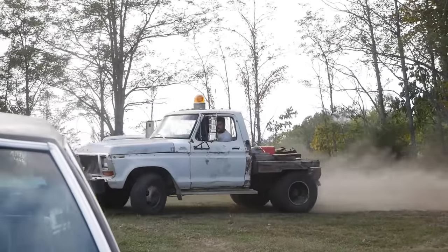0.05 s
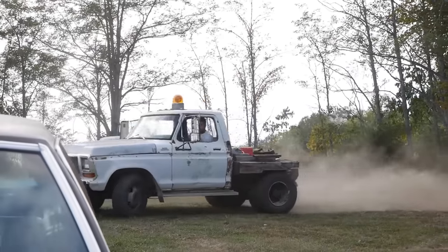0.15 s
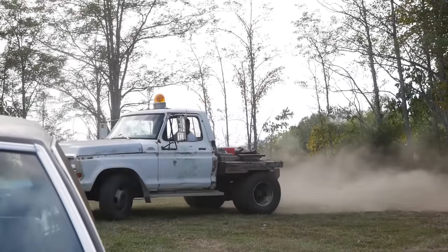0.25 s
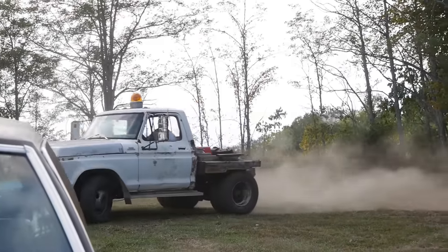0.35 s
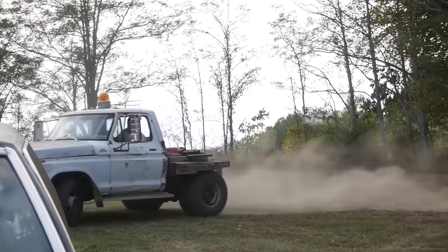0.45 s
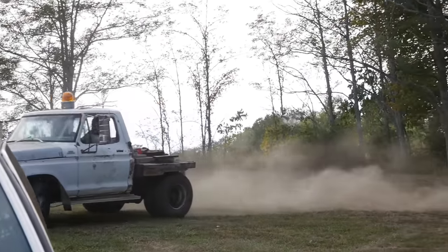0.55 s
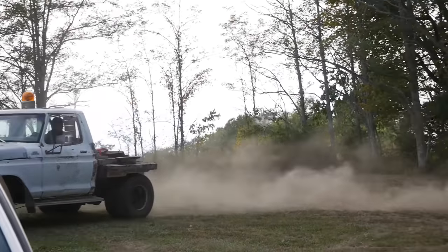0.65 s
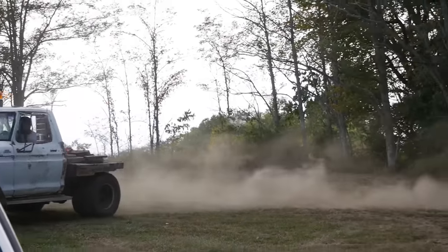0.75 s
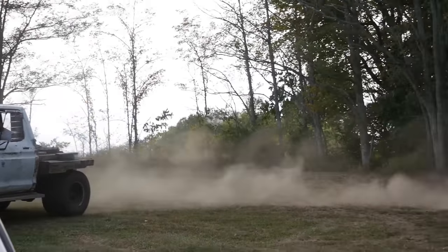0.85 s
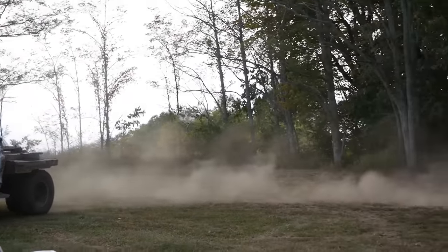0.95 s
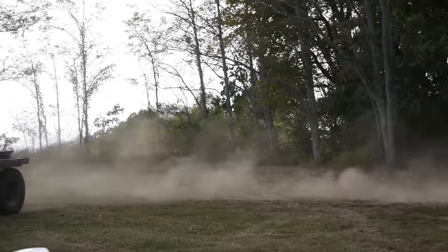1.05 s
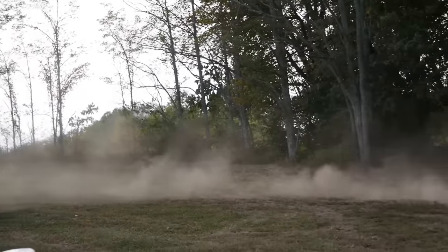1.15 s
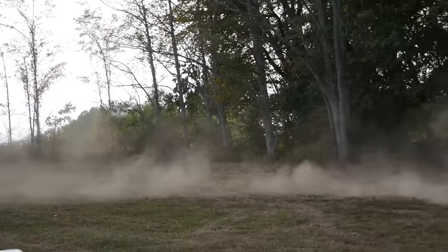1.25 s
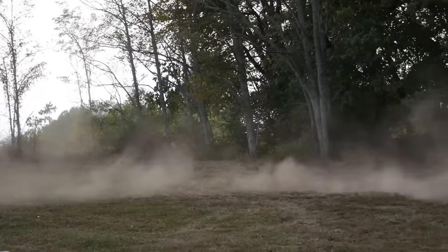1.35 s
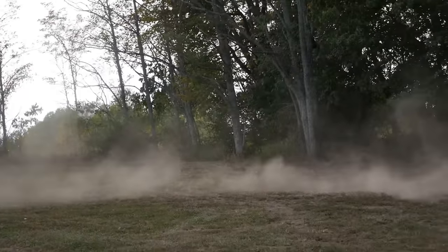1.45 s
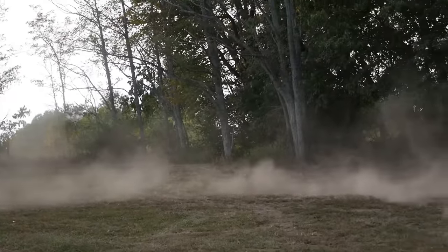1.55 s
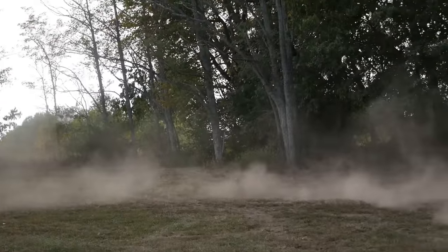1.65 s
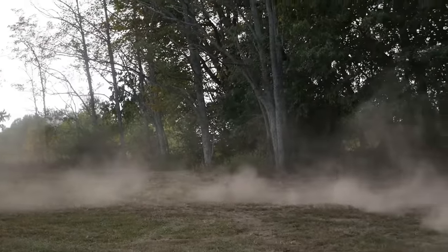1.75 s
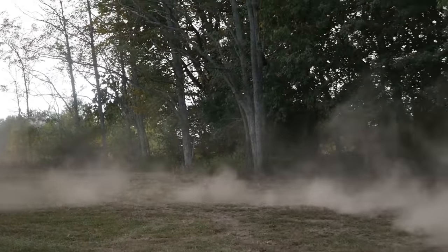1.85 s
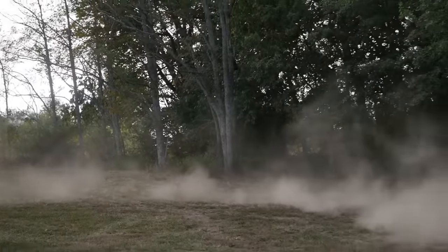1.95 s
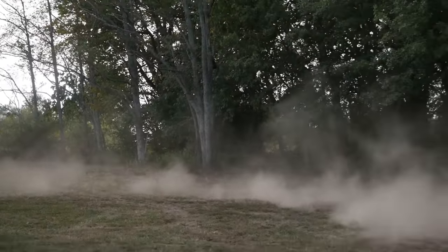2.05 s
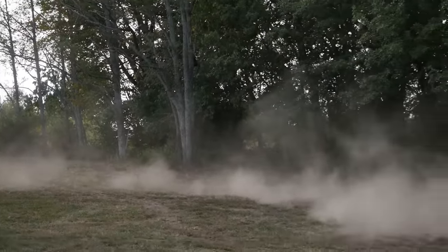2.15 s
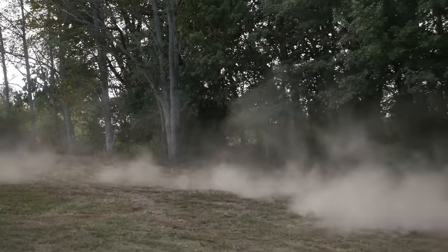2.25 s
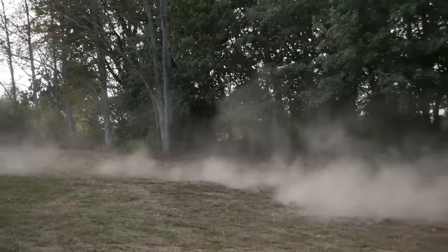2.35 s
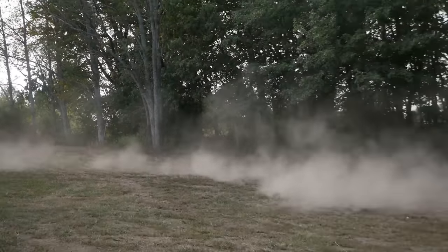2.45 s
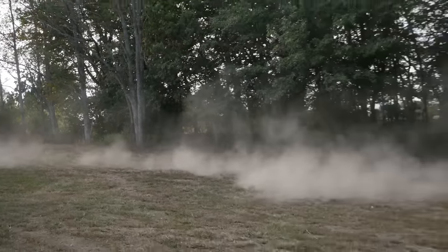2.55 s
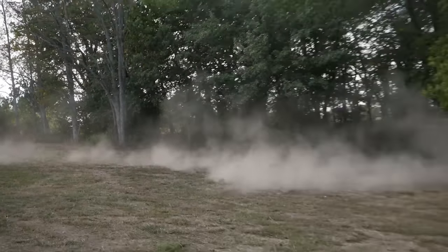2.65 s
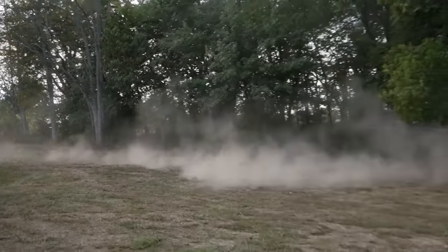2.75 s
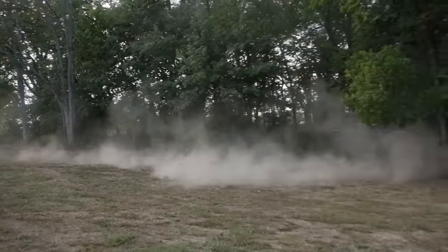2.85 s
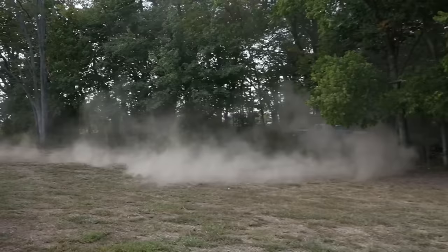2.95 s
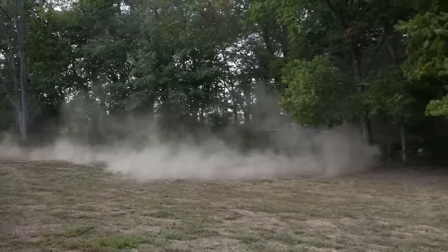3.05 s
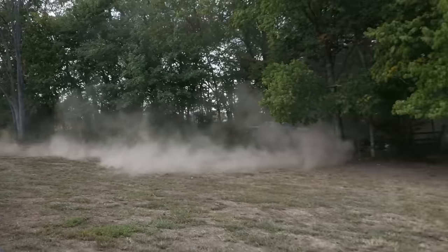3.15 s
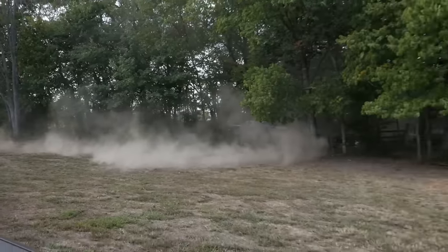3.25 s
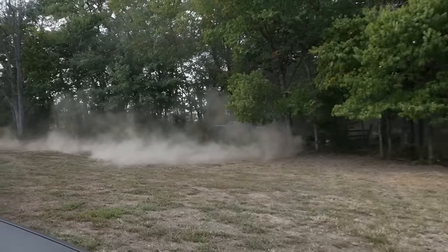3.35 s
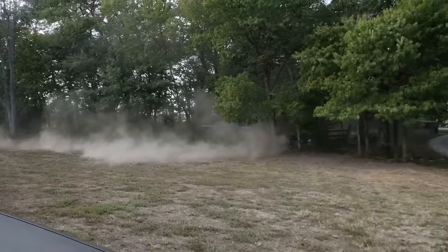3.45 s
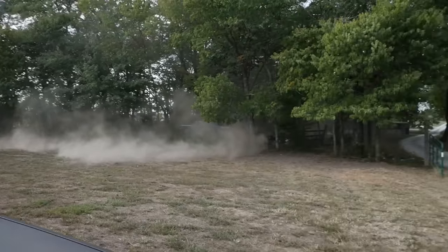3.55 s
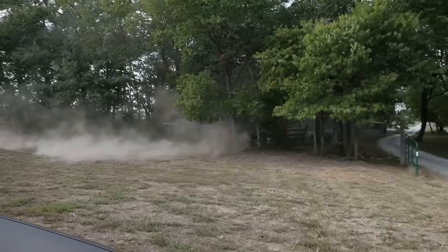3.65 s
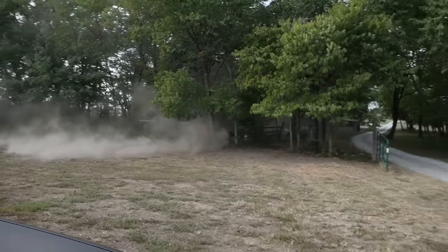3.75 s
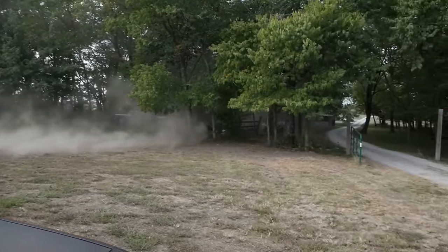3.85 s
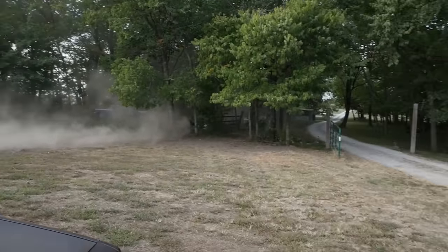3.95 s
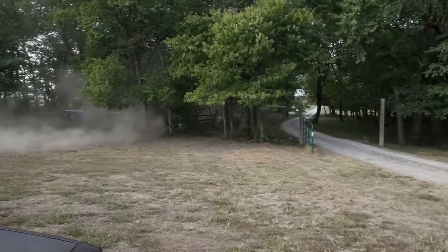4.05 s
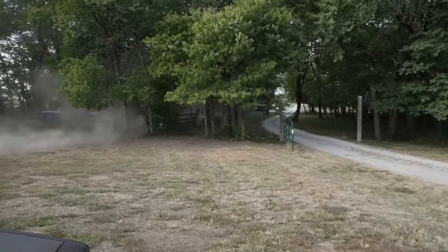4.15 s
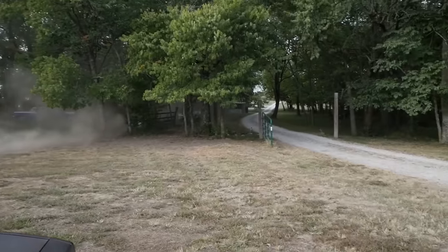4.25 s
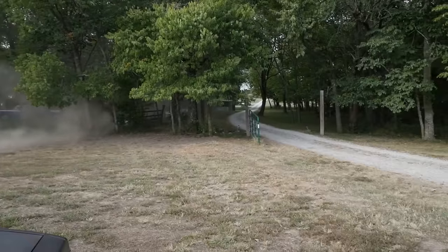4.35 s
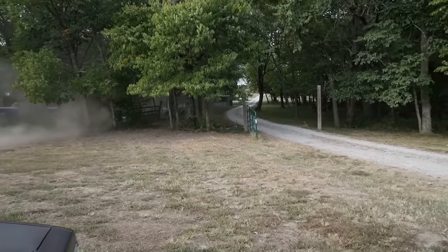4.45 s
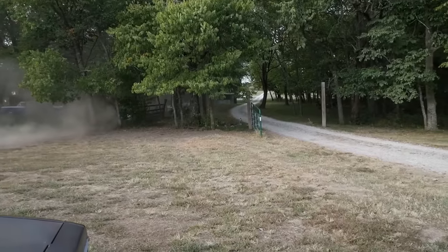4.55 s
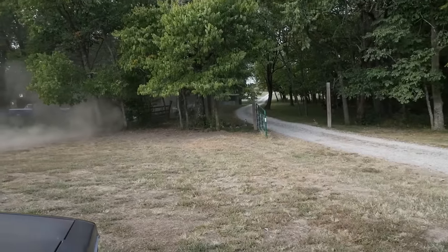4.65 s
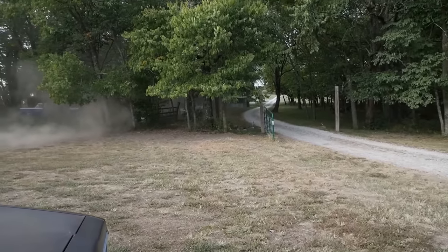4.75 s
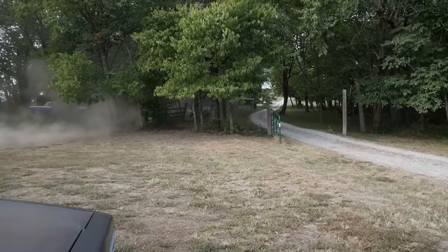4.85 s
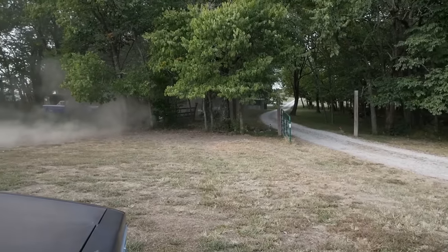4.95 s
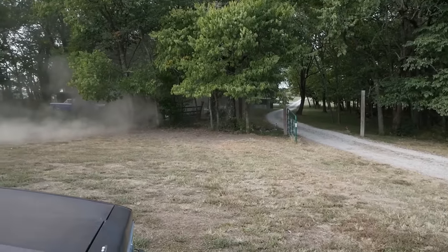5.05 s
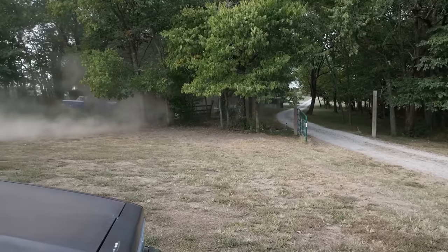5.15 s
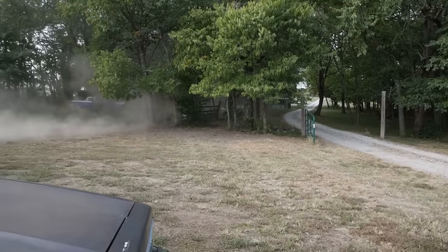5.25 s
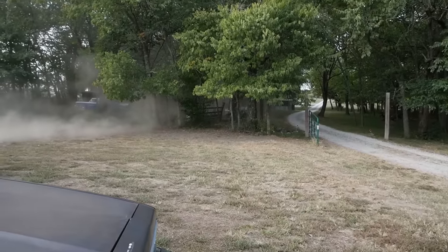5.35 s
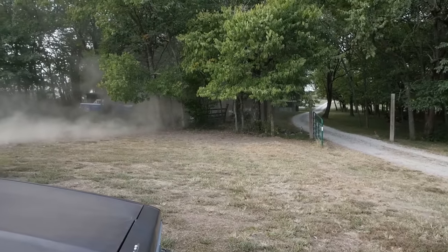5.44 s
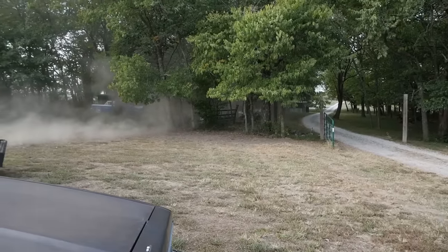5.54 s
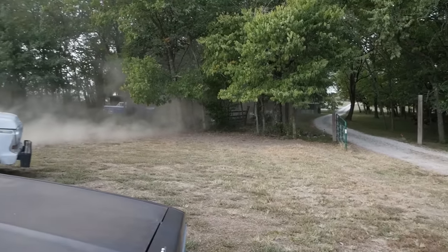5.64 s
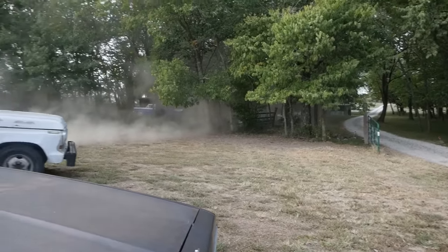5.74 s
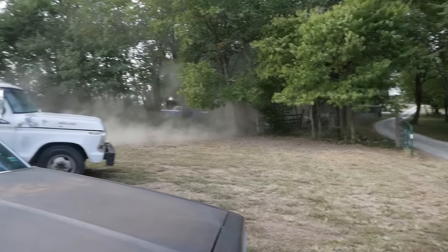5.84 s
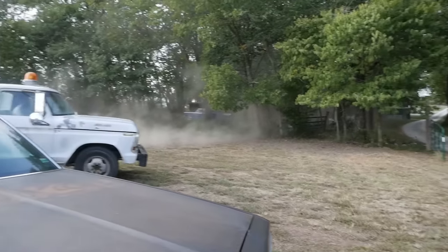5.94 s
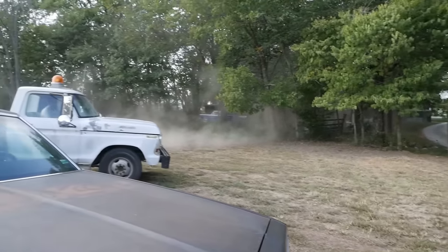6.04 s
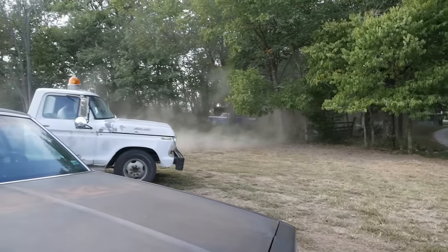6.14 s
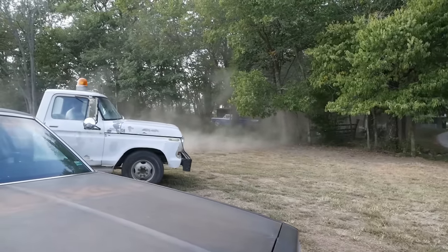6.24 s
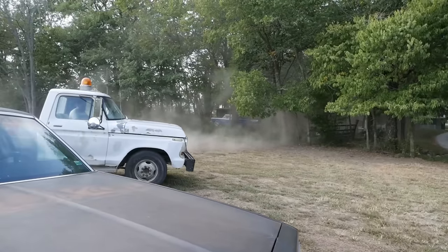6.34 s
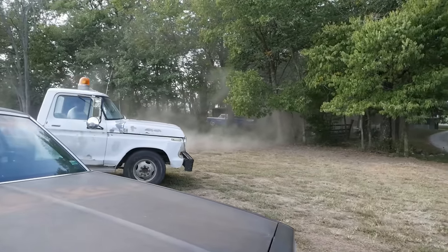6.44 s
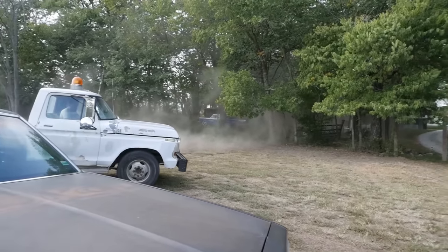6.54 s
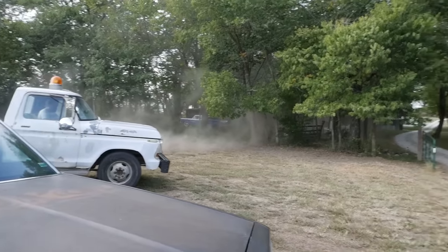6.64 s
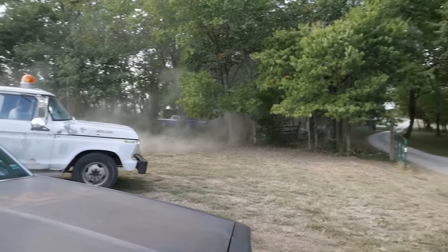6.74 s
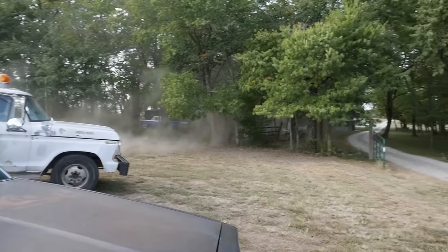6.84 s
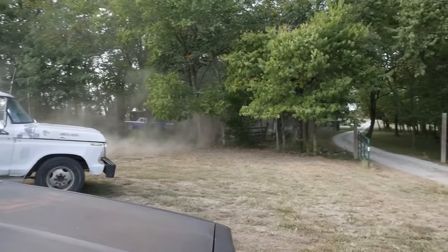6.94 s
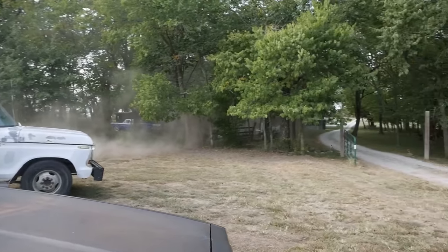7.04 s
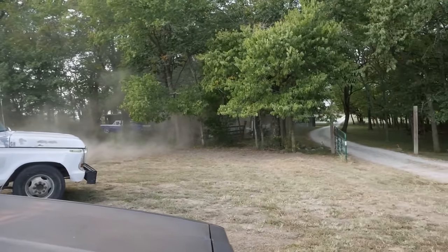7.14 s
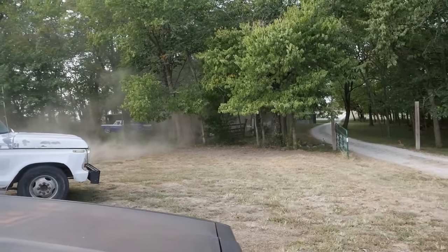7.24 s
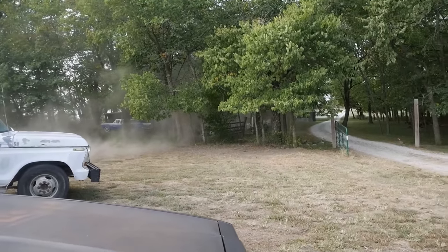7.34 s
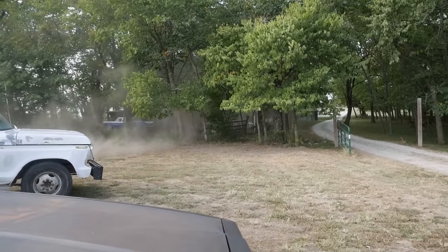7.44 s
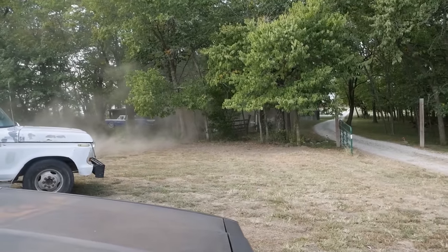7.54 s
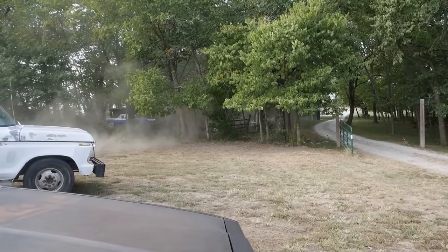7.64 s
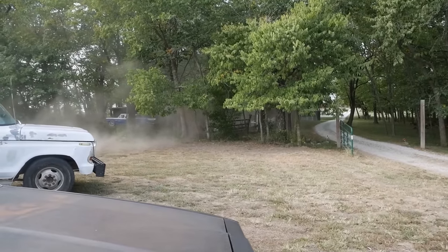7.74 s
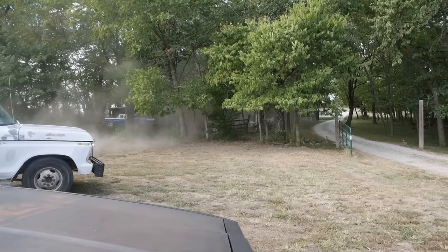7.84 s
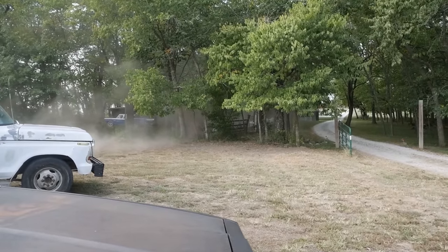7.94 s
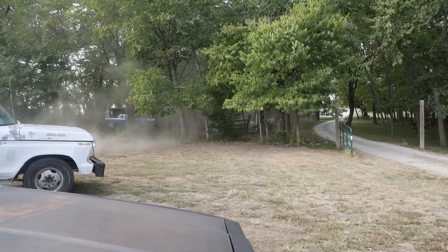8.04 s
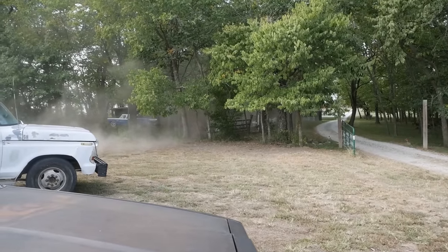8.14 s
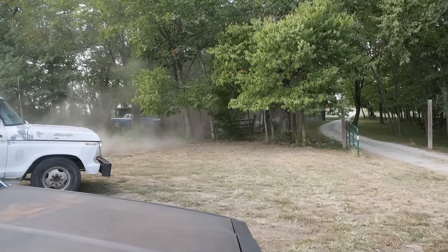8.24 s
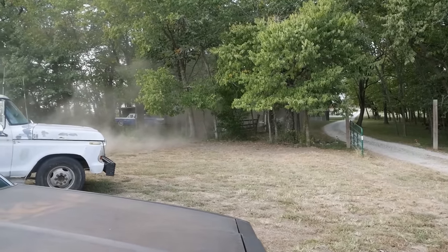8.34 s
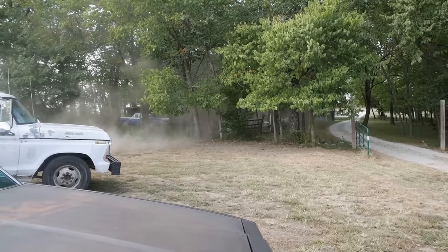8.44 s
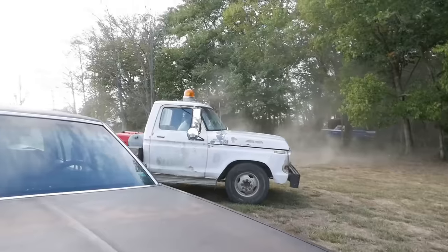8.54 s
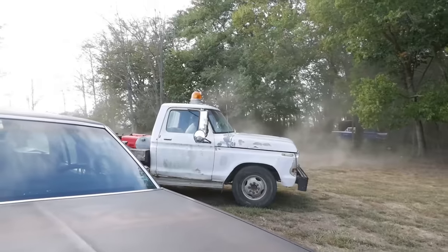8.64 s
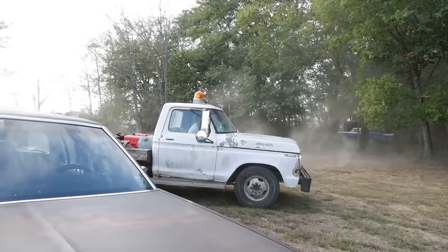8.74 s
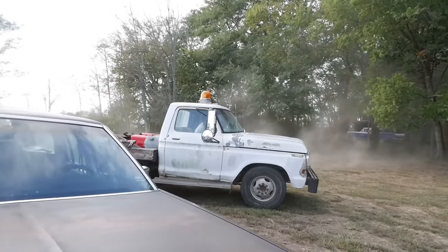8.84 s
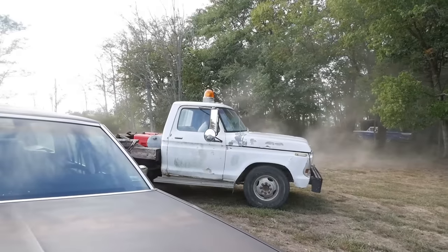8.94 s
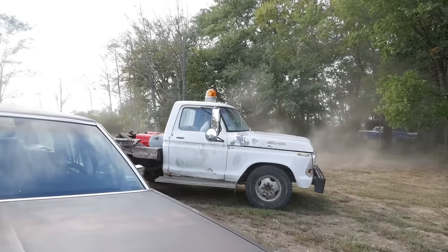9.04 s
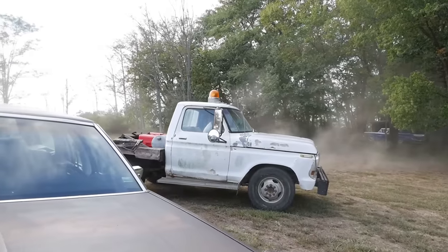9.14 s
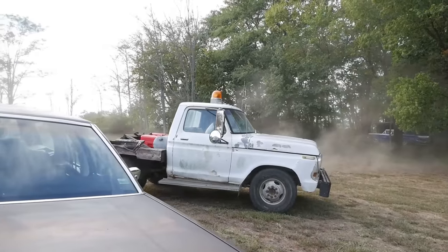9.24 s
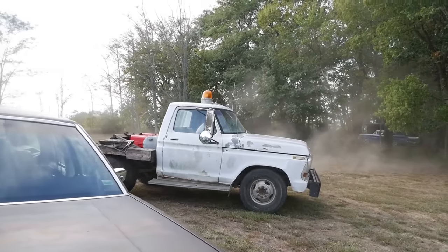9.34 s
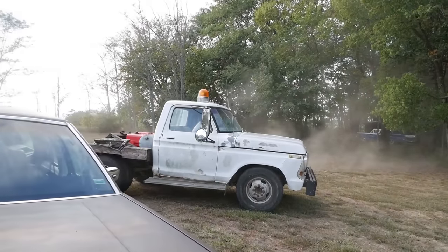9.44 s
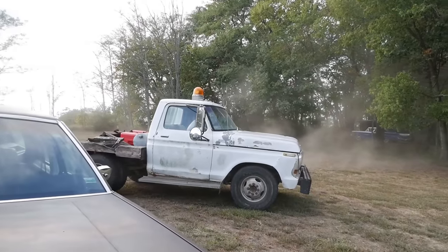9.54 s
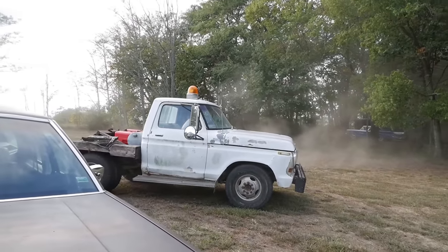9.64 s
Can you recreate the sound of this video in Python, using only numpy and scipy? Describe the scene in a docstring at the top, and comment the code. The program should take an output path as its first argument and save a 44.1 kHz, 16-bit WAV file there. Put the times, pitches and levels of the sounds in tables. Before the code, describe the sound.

Outdoors, a few metres from an old V8 truck: throaty, uneven exhaust with tyre drumming and body rattles sags, then closes down to loose ticking. A short blip collapses into heavy single thumps and a stall. About a second of near-quiet field, then the starter clanks and grinds with metallic clashes. Phone-like recording, nearly mono, thin in deepest bass.

```python
"""A field, a few metres from an old V8 flatbed truck: the revs sag, the throttle closes, a blip, lone firings,
a stall, then the starter grinds. Firing pulses ring the exhaust pipe under gusts of noise; body rattles, puffs,
squeaks and scrapes are shaped bursts of noise, and gear clashes excite ringing metal modes. Settling knocks
are decaying tones. Insects, a far drone and a hum fill the quiet."""
import sys
import numpy as np
from scipy import signal
from scipy.fft import rfft, irfft, next_fast_len
from scipy.io import wavfile
from scipy.ndimage import uniform_filter1d

SR = 44100
rng = np.random.default_rng(int(sys.argv[2]) if len(sys.argv) > 2 else 0)


def master_out(mix):
    """Clip the mix to full scale and print it as 16-bit PCM to the path in sys.argv[1]."""
    frames = np.transpose(np.atleast_2d(mix))
    ceiling = np.clip(frames, -1, 1)
    pcm = np.round(ceiling * 32767).astype(np.int16)
    wavfile.write(sys.argv[1], SR, pcm)


N = 427309
T = np.arange(N) / SR

# Levels in the tables are before each layer's own trims and resonances.

# Firing rate of the whole engine [t/s, f/Hz]
REVS = [(0, 82.8), (.25, 76.8), (.7, 61.6), (1.2, 66.0), (1.5, 54.7), (1.75, 57.0), (2, 53.5), (2.3, 56.5),
        (2.75, 47.6), (3, 51.6), (3.3, 49.2), (3.75, 49.3), (4, 51.7), (5.6, 32.85), (5.75, 49), (5.9, 55),
        (6.05, 62), (6.2, 64), (6.3, 43.6)]
# Cylinders in firing order, every other one comes by the far pipe [level/dB]
CYLINDERS_DB = [-6, -16, -6, -16, -1, -16, 0, -16]
# Throttle, heard as the level of the exhaust [t/s, level/dB]
THROTTLE = [(0, -31.5), (.3, -35), (.45, -42.5), (.62, -35.5), (.9, -31.5), (1.4, -27), (1.75, -32),
            (2.0, -24.5), (2.5, -23.5), (2.75, -28), (3.0, -23), (4.02, -26), (4.08, -43.5), (5.0, -60.5),
            (5.45, -32.5), (5.66, -37.5), (5.74, -24.5), (5.95, -20), (6.08, -19.5), (6.16, -17),
            (6.22, -28), (6.26, -65)]
# How lumpy the engine turns [t/s, share 0-1 of the cylinder pattern]
LOPE = [(0, 0.5), (.35, 0.85), (1.75, 0.2), (3.0, 0.8), (3.9, 0.88), (4.1, 0.5), (5.7, 0.58), (6.26, 0.7)]
FIRST_PHASE = 0.87  # of a firing
EVEN_DB, UNEVEN_DB = 1.4, 4  # scatter of the firings with the throttle open and shut
OPEN_DB, SHUT_DB = -25, -36  # exhaust levels that count as open and shut
LATE_S = 0.0012  # most a firing comes late, per dB of scatter
# Exhaust pipe resonances [f/Hz, t60/s, level/dB]
PIPE = [(30, 0.079, -2), (63, 0.21, -32), (77.6, 0.27, 3), (91.6, 0.13, -4), (120, 0.056, -2.5),
        (152, 0.041, -17), (250, 0.056, -31), (328, 0.034, 3)]
# Gas tearing at the pipe's mouth [f/Hz, width/Hz, level/dB]
RASP = [(1450, 120, 6), (1815, 80, -7), (2100, 280, 4.5), (3250, 220, -0.5), (3750, 130, -14),
        (5050, 200, -24)]
RASP_DB, RASP_T60_S = -22.5, 0.061  # level against the exhaust
# Gas roar and fan [t/s, level/dB, treble/dB]
ROAR = [(0, -33.5, -4), (.72, -35, -8), (.92, -30.5, -10), (1.5, -31, -9.5), (1.87, -30, -11.5),
        (2.1, -30.5, -12), (2.9, -34.5, -7.5), (3.34, -30, -9), (4.04, -33, -5.5), (4.23, -45.5, -2.5),
        (4.6, -30, -12), (5.16, -43, -5), (5.25, -39.5, -5.5), (5.42, -40.5, -3), (5.5, -31.5, -8.5),
        (5.65, -37.5, -6), (5.74, -27, -11), (6.04, -30.5, -2.5), (6.1, -28.5, 1), (6.2, -30, -4.5),
        (6.33, -35.5, 1), (6.71, -34.5, -2), (6.96, -39, -4), (7.11, -30, -8), (7.3, -46.5, 2.5),
        (7.5, -47.5, -10), (7.6, -50, -25)]
# Spectrum of the roar [f/Hz, level/dB per Hz]
ROAR_COLOUR = [(71, 2.5), (120, -4), (156, -4.5), (208, -9), (598, -11.5), (676, -16), (936, -16.5),
               (1690, -27), (4390, -36), (5610, -36.5), (9710, -51.5), (14300, -51), (15500, -71)]
# Engine bay and tailpipe resonances in the roar [f/Hz, width/Hz, level/dB]
BAY = [(900, 100, 0.5), (1523, 165, -5.5), (1790, 310, -9.5), (2150, 230, -8.5), (2610, 240, -8.5),
       (3290, 300, -6), (3700, 430, -7.5), (5240, 490, -8.5)]
BAY_PATCHY_DB, CRACKLE_DB = 4, 2
# Tyres on turf: level against the roar, and its fade as the firing rate sags below full
DRUM_DB, DRUM_DB_PER_HZ, DRUM_FULL_HZ = -2, 0.57, 67.4

# Spectrum of the far traffic and leaves [f/Hz, level/dB per Hz]
FIELD = [(12, -36), (20, 17), (98, -13.5), (153, -2.5), (213, -21), (289, -5), (465, -13.5), (565, -8.5),
         (705, -12), (857, -7), (1870, -28.5), (6540, -41), (7730, -46), (8880, -46), (15500, -44.5)]
FIELD_DB = -43.5
DRONE_HZ, DRONE_DB = 587, -57.5
INSECT_HZ, INSECT_DB = 7840, -70.5
HUM_HZ, HUM_WIDTH_HZ, HUM_DB = 877, 145, -56  # far machinery

# Stray puffs [t/s, level/dB, centre f/Hz]
PUFFS = [(.008, -49, 6050), (.142, -42, 5000), (.172, -38, 4500), (.33, -36, 4500), (.56, -41, 4470),
         (.586, -42, 4500), (.6784, -38, 4550), (.7223, -43, 3910), (1.1298, -40, 5520),
         (1.4666, -35, 3670), (3.423, -37, 4730), (3.506, -35.5, 4120), (3.55, -37, 4470),
         (4.253, -42, 4670), (4.5491, -37.5, 3920), (4.6159, -32.5, 4870), (5.7344, -39, 3650),
         (5.7813, -35, 3600), (5.8561, -38, 3580), (5.8995, -31.5, 3570), (5.9665, -31, 3900),
         (5.985, -36, 5240), (6.0666, -27.5, 3800), (6.09, -31, 4900), (6.12, -31, 4940),
         (6.1504, -28, 3700), (6.254, -29, 5400), (6.255, -42, 4000), (6.438, -47, 5000),
         (6.439, -30, 4000), (6.56, -33, 3700), (6.699, -27, 3640), (7.059, -33, 3650), (7.3218, -40, 5160),
         (8.351, -61, 4000), (8.381, -60, 3500)]
# Cylinders that puff through a leaking exhaust joint [cylinder index: level/dB]
LEAK_DB = {6: -52, 0: -39, 2: -35.5}
LEAK_START_S, LEAK_END_S = 2.92, 4.05
LEAK_LAG_S, LEAK_HZ = 0.004, 4800
LEAK_SWELL_DB = 4.5  # the leak is loudest midway
LEAK_AIR_DB, PUFF_AIR_DB = -12.5, -27

# Body rattles [t/s, level/dB, panel f/Hz, bracket level/dB]
RATTLES = [(.121, -23, 1290, -4), (.144, -23, 1050, -10), (.169, -43, 406, 5.5), (.197, -21, 1000, -10),
           (.323, -24, 990, -6), (.376, -24.5, 970, -19), (.412, -39, 1050, -16), (.46, -35, 1100, -16),
           (.505, -39, 950, -14), (.59, -33, 1050, -8), (.655, -32, 900, -18), (.681, -21, 945, -11),
           (.702, -27, 900, -18), (.782, -28.5, 1150, -17), (.858, -41, 1240, -16), (.907, -29, 1220, -16),
           (.93, -28, 875, -17), (.956, -25.5, 840, -10), (1.042, -30.5, 900, -4.5),
           (1.131, -24, 816, -5.5), (1.469, -22.5, 640, -6), (1.769, -23.5, 890, -20),
           (1.865, -23, 840, -11), (1.912, -29, 504, -7), (2.867, -23.5, 820, -17), (3.215, -36, 433, -4),
           (3.424, -26, 840, -22), (3.487, -24, 595, -17), (4.279, -31, 835, -17), (4.477, -33, 910, -10),
           (4.566, -24, 415, -22), (4.6, -35, 300, -25), (4.645, -35, 327, -23), (4.858, -29, 920, -8),
           (4.879, -25.5, 1040, -11), (5.192, -25, 810, -5.5), (5.207, -35, 870, -16),
           (5.287, -33, 860, -18), (5.411, -24.5, 890, -4.5), (5.428, -28.5, 1260, -8),
           (5.701, -23, 486, -11), (5.77, -24.5, 840, -18), (5.855, -26, 590, -2.5),
           (5.906, -29.5, 880, -1), (5.999, -28, 890, -0.5), (6.099, -37, 514, 5), (6.153, -20.5, 830, -5),
           (6.5, -40, 900, -6), (6.773, -20.5, 517, -11), (6.81, -30.5, 514, -11), (6.84, -29, 1500, -3.5),
           (6.925, -36, 830, -14), (6.98, -32, 440, -3.5), (7.027, -23, 530, -13), (7.12, -26.5, 720, 2),
           (7.218, -32, 1030, 0.5), (7.267, -33, 925, 2), (7.338, -23.5, 526, -19), (7.4, -37, 890, -13),
           (7.529, -49.5, 900, -7), (7.662, -46, 1500, -9), (7.79, -59, 900, -0.5), (7.863, -49, 416, -20),
           (7.907, -66, 900, -3), (7.983, -59, 900, -4), (8.07, -47, 900, -6), (8.128, -27, 464, -21),
           (8.192, -44, 510, -12), (8.322, -35, 410, -10), (8.524, -42.5, 900, -13)]
# Whole body [f/Hz, width/Hz, level/dB]
BODY = [(396, 103, 5), (547, 275, 4), (887, 630, 6), (1320, 520, -21), (2020, 320, -10)]
# Brackets [f/Hz, width/Hz, level/dB]
BRACKET = [(1430, 54, 4), (1800, 180, 4), (2724, 48, 2), (3590, 68, 4), (2420, 1770, -2)]
RATTLE_T60_S, T60_S_PER_DB = 0.092, 0.0034  # ring of a -23.5 dB rattle; softer ones smear longer
BUMPS_PER_S, BUMPS_END_S, BUMP_DB = 7, 4.0, -34  # small chance rattles while the truck rolls
BRACKET_TILT = 0.62  # dB per octave for each dB: bracket-heavy blows ring their upper modes

# Breathy squeaks [t/s, length/s, f/Hz, level/dB]
SQUEAKS = [(.21, .06, 14200, -61), (.215, .045, 9550, -57), (.22, .14, 12000, -68), (.245, .05, 8600, -57),
           (.3, .05, 12300, -62), (.36, .1, 14200, -70), (.295, .065, 14300, -56), (.544, .051, 13900, -64),
           (0.79, .12, 14200, -63), (0.894, 0.072, 5550, -45.5), (0.947, 0.11, 5500, -51),
           (1.067, 0.14, 9250, -60), (1.192, 0.089, 5300, -54.5), (1.287, 0.13, 5300, -61),
           (1.378, 0.18, 5470, -61), (1.48, .36, 14000, -70), (1.59, 0.07, 5460, -52),
           (1.661, 0.094, 5330, -47.5), (1.74, 0.1, 5380, -57), (1.97, .17, 5530, -62),
           (2.33, 0.13, 5470, -57), (2.69, 0.15, 5380, -60), (2.82, 0.12, 5470, -53),
           (2.7, 0.28, 14000, -73), (3.42, .12, 14200, -73), (4.394, 0.24, 5370, -61),
           (5.25, .08, 13800, -66), (5.587, .1, 13700, -68), (5.91, 0.056, 14000, -62),
           (6.927, .04, 14000, -62), (7.082, 0.066, 14100, -60)]
# Lines of a low squeak [multiple of its pitch, level/dB, flutter/(1/s)]
SQUEAL = [(1, -1, 40), (1.05, -4, 60), (1.1, -10, 80)]
OCTAVE_DB = -21  # low squeaks carry their octave
SAG_HZ_PER_S = -500
TOP_HZ = 15900  # top of the phone's range

# Loose metal scraping as the engine shudders [t/s, length/s, f/Hz, level/dB]
SCRAPES = [(3.18, 0.091, 3240, -50), (3.2, 0.055, 1480, -45), (3.32, 0.13, 1450, -45),
           (6.07, 0.075, 5080, -43), (6.08, 0.079, 1820, -38), (6.09, .07, 1480, -39),
           (6.27, 0.12, 2580, -51), (6.3, 0.14, 1820, -46), (6.33, .08, 1470, -42), (6.36, .07, 2130, -46),
           (6.42, 0.062, 1740, -50), (6.58, 0.088, 1700, -48), (6.64, 0.053, 3000, -52),
           (6.67, 0.055, 1500, -43), (6.76, 0.076, 550, -39), (7.12, 0.049, 2680, -48),
           (7.22, 0.037, 2740, -47)]
SCRAPE_WIDTH_HZ = 140

# Lone firings [t/s, level/dB, crack level/dB]
POPS = [(4.243, -37, -8), (4.401, -34.5, -12), (4.55, -38.5, -7), (4.622, -32, -15), (4.705, -30, -15),
        (4.856, -37, -7), (5.262, -30, -15), (5.299, -32, -14), (5.427, -30, -20), (5.495, -27, -40),
        (5.559, -26.5, -18), (6.251, -19, -10), (6.341, -19.5, -29), (6.436, -18.5, -16.5),
        (6.559, -19.5, -18.5), (6.697, -24.5, -8.5), (6.741, -28, -27), (6.874, -27.5, -21),
        (7.033, -30, -16), (7.056, -23, -10.5), (7.353, -44, -1.5), (8.133, -37.5, -6.5), (9.115, -35, -31),
        (9.175, -42, -28), (9.24, -35, -26), (9.347, -22, -24), (9.382, -24.5, -26), (9.443, -28, -25),
        (9.529, -29.5, -10), (9.649, -37, -5.5)]
# Resonances of the crack [f/Hz, t60/s, level/dB]
CRACK = [(355, 0.049, -6.5), (480, 0.033, 2), (828, 0.016, 6), (1120, 0.025, -5), (1530, 0.085, -13.5)]
# Gas fizz [f/Hz, width/Hz, level/dB]
FIZZ = [(2210, 300, -13), (3680, 450, 11), (5170, 530, 6), (10000, 8700, -14.5)]
# Muffler box [f/Hz, t60/s, level/dB]
MUFFLER = [(117, 0.03, 8.5), (184, 0.026, 3.5), (340, 0.025, 3), (560, .03, 7), (850, .025, 3)]
FIZZ_DB, FIZZ_POWER, FIZZ_PER_CRACK = -38.5, 1.8, 0.11  # for a -23.5 dB pop; grows faster than the thump

# The stalled block rocking on its mounts [t/s, level/dB, t60/s]
ROCKS = [(7.395, -18.5, 0.83), (7.53, -21, 0.51), (8.525, -20, 0.43), (9.06, -13, .3), (9.1, -6, 0.52),
         (9.52, -13, 0.44)]
ROCK_HZ = 14.7
# Dull knocks from the cooling body [t/s, level/dB]
KNOCKS = [(7.858, -39), (7.9, -49), (8.134, -39), (8.335, -41.5), (8.369, -45)]
# Modes of a knock [f/Hz, t60/s, level/dB]
KNOCK = [(300, 0.096, 0), (425, 0.11, 1.5)]

# Starter motor [t/s, grind level/dB, housing level/dB]
STARTER = [(8.66, -50, -27.5), (8.74, -32.5, -33), (8.8, -26, -34), (8.85, -35, -31.5), (8.93, -53, -35),
           (9.01, -29.5, -33), (9.05, -28, -40), (9.11, -35, -38), (9.16, -29, -41.5), (9.225, -32, -36.5),
           (9.255, -33, -31), (9.29, -34, -37), (9.325, -30.5, -44), (9.42, -33, -36), (9.478, -37, -35),
           (9.53, -34, -38), (9.583, -37, -44), (9.63, -38, -43), (9.69, -41, -32)]
# Spectrum of the gear noise [f/Hz, level/dB per Hz]
GEAR_WASH = [(880, -24), (1500, -5.5), (1900, -3.5), (2150, -10), (2450, -4.5), (3040, -5), (4260, -7.5),
             (5180, -6.5), (8000, -26), (10400, -56), (17600, -120)]
# Metal modes of the gears [f/Hz]
GEAR_HZ = [1420, 2310, 2430, 2580, 2990, 3160, 3400, 3630, 3830, 4200, 4550, 4920, 5070, 5250, 5570, 5960]
# Pinion blows on the ring gear [t/s, level/dB, t60/s, then the three modes that sing out f/Hz]
CLASHES = [(8.637, -15.5, 0.099, 3640, 5070, 5580), (8.663, -9, 0.032, 5530, 4600, 5960),
           (8.671, -7.5, 0.061, 1452, 1900, 3090), (8.805, -23.5, 0.73, 2560, 2590, 3150),
           (8.997, -27, 0.045, 5000, 5400, 2480), (9.027, -31, 0.11, 4500, 2650, 5500),
           (9.065, -18, 0.21, 2460, 3180, 3460), (9.095, -21, 0.12, 3440, 4970, 2990),
           (9.112, -6, 0.072, 5550, 2560, 3160), (9.168, -8.5, 0.14, 2573, 3750, 3600),
           (9.239, -11, 0.14, 4990, 3180, 2490), (9.285, -21.5, 0.74, 2530, 3070, 5150),
           (9.4, -36, .1, 3190, 2560, 3880), (9.435, -5, 0.07, 5600, 2990, 3170),
           (9.486, -9.5, 0.11, 3030, 4560, 5320), (9.535, -17, 0.051, 5270, 4510, 1440),
           (9.545, -8.5, 0.1, 3030, 5350, 3800), (9.59, -7.5, 0.085, 2990, 5260, 3640),
           (9.641, -12, 0.14, 2850, 5000, 3620)]
RISE_SHARE = 0.047  # rise time constant of a blow, as a share of its ring
SING_DB, SING_WIDTH_HZ, SING_STAGGER_S = -14.5, 140, 0.005  # a blow's modes sing out one after another
ENGAGE_S, ENGAGE_DB, ENGAGE_T60_S = 8.6635, -11.5, 0.023  # the pinion snaps into mesh
CRANKS_S, BRUSH_DB = 8.99, -50.5  # the brushes hiss once the engine turns
# Groans of the loaded starter in its housing [t/s, length/s, f/Hz, level/dB]
GROANS = [(8.75, .08, 1220, -36), (8.79, 0.073, 580, -34), (8.84, 0.11, 754, -38), (8.875, 0.051, 410, -35),
          (8.89, 0.1, 1022, -38), (8.907, 0.053, 324, -31), (8.91, .07, 148, -37),
          (9.11, 0.051, 1025, -38.5), (9.24, .06, 410, -36), (9.63, 0.058, 904, -40)]
GROAN_WIDTH_HZ = 44


def undb(db):
    """Turn decibels into gain."""
    return 10 ** (np.asarray(db) / 20)


def unit(x):
    """Scale to rms 1."""
    return x / np.sqrt(np.mean(x ** 2))


def curves(table):
    """Columns of a table, joined by straight lines in time."""
    s, *columns = np.transpose(table)
    return [np.interp(T, s, c) for c in columns]


def noise_source():
    """Fresh white noise for the whole scene."""
    return rng.standard_normal(N)


def band(x, hz, width):
    """One resonance, gain 1 at the centre."""
    return signal.lfilter(*signal.iirpeak(hz, hz / width, SR), x)


def narrow(x, hz, width):
    """A resonance applied twice: steep skirts."""
    return band(band(x, hz, width), hz, width)


def resonate(x, modes):
    """Sum of fixed resonances, rms 1."""
    # 1.52 makes up for the narrowing of the double pass
    return unit(sum(undb(db) * narrow(x, hz, 1.52 * width) for hz, width, db in modes))


def ring(x, modes):
    """Decaying modes struck by x."""
    out = 0
    for hz, t60, db in modes:
        pole = np.exp(2j * np.pi * hz / SR - np.log(1000) / (t60 * SR))
        out = out + undb(db) * signal.lfilter([1], [1, -pole], x).imag
    return out


def dull(x, hz):
    """Steep low-pass."""
    return signal.sosfilt(signal.butter(4, hz, fs=SR, output="sos"), x)


def coloured(points):
    """Noise with a drawn spectrum, rms 1."""
    hz, db = np.transpose(points)
    size = next_fast_len(N)
    f = np.maximum(np.fft.rfftfreq(size, 1 / SR), 1)
    gain = undb(np.interp(np.log(f), np.log(hz), db))
    return unit(irfft(rfft(rng.standard_normal(size)) * gain, size)[:N])


def walk(rate):
    """Random levels held 1 / rate s and slewed twice; spread near 1."""
    k = int(SR / rate)
    steps = np.repeat(rng.standard_normal(N // k + 1), k)
    return 0.9 * uniform_filter1d(uniform_filter1d(steps, k), k)[:N]


def bursts(times, dbs, t60s, rises):
    """Envelope of events with a rise and an exponential fall."""
    env = np.zeros(N)
    for s, db, t60, rise in np.broadcast(times, dbs, t60s, rises):
        i = int(s * SR)
        t = T[:min(int(t60 * SR), N - i)]
        env[i:i + len(t)] += undb(db - 60 * t / t60) * (1 - np.exp(-t / rise))
    return env


def swells(rows, width_hz):
    """Short swells of noise through single resonances."""
    out, noise = np.zeros(N), noise_source()
    for s, length, hz, db in rows:
        i, n = int(s * SR), int(length * SR)
        tone = narrow(noise[i - n:i + n], hz, width_hz)[n:]  # the filter settles ahead of the swell
        out[i:i + n] += undb(db) * unit(tone) * signal.windows.tukey(n, .6)
    return out


def firings():
    """Sample and cylinder of every regular firing, from the running phase of the firing rate."""
    phase = FIRST_PHASE + np.cumsum(curves(REVS)[0]) / SR
    at = np.flatnonzero(np.diff(np.floor(phase))) + 1
    at = at[T[at] < THROTTLE[-1][0]]
    return at, (np.floor(phase[at]).astype(int) - 1) % len(CYLINDERS_DB)


def engine():
    """Eight cylinders fire in turn into the ringing pipe, with rasp, tyre drum and gusts of roar."""
    (exhaust_db,), (lope,) = curves(THROTTLE), curves(LOPE)
    scatter_db = np.interp(exhaust_db, [SHUT_DB, OPEN_DB], [UNEVEN_DB, EVEN_DB])
    at, cylinder = firings()
    pattern_db = lope[at] * np.array(CYLINDERS_DB)[cylinder]
    fire_db = pattern_db + scatter_db[at] * rng.standard_normal(len(at))
    late = (LATE_S * SR * scatter_db[at] * rng.random(len(at))).astype(int)  # uneven burns also come late
    kicks = np.zeros(N)
    kicks[at + late] = undb(fire_db + exhaust_db[at])
    push = signal.windows.hann(int(0.0043 * SR))  # the valve opens over a few milliseconds
    exhaust = undb(4.0) * ring(np.convolve(kicks, push / push.sum())[:N], PIPE)
    rasp_db = RASP_DB + exhaust_db[at] + 4 * rng.standard_normal(len(at))
    rasp = bursts(T[at], rasp_db, RASP_T60_S, 0.0027) * resonate(noise_source(), RASP)
    # each firing gusts the roar while the exhaust is strong
    gust = 1.5 + 0.96 * bursts(T[at], fire_db, 0.027, 0.0023) * (exhaust_db > -35)
    return exhaust + rasp + roar_and_drum(gust)


def roar_and_drum(gust):
    """Gas roar with fluttering bass, treble and resonances; tyres drum on turf in one low band."""
    roar_db, treble_db = curves(ROAR)
    (hz,) = curves(REVS)
    noise = coloured(ROAR_COLOUR)
    # bay and tailpipe resonances come and go
    noise = noise + sum(undb(db + BAY_PATCHY_DB * walk(14)) * band(noise, f, w) for f, w, db in BAY)
    deep = signal.sosfilt(signal.butter(2, 1700, fs=SR, output="sos"), noise)
    bass = unit(deep * undb(2.0 * walk(120))) * undb(3.24 * walk(18))
    flicker_db = 1.33 * walk(25) + CRACKLE_DB * walk(300)
    treble = unit(noise - deep) * undb(treble_db + flicker_db)
    roar = (bass + treble) * gust * undb(roar_db - 5.0)
    drum_db = roar_db + DRUM_DB + DRUM_DB_PER_HZ * np.minimum(hz - DRUM_FULL_HZ, 0)
    drum = unit(narrow(noise_source(), 157.5, 124)) * undb(drum_db + 0.71 * walk(20))
    return (drum + roar) * (T < ROAR[-1][0])


def field():
    """Far traffic and leaves as shaped noise, a wavering drone tone, bands of insects and machinery hum."""
    drone = np.sin(2 * np.pi * np.cumsum(DRONE_HZ + 3.18 * walk(7.4)) / SR)
    drone = drone * undb(DRONE_DB + 0.83 * walk(17))
    insects = unit(narrow(noise_source(), INSECT_HZ, 760)) * undb(INSECT_DB + 0.4 * walk(12))
    hum = unit(narrow(noise_source(), HUM_HZ, HUM_WIDTH_HZ)) * undb(HUM_DB + 2.1 * walk(10))
    return coloured(FIELD) * undb(FIELD_DB + 1.5 * walk(5)) + drone + insects + hum


def joint_leaks():
    """Three cylinders puff through the leaking exhaust joint, a moment after they fire."""
    middle_s, half_db = (LEAK_START_S + LEAK_END_S) / 2, LEAK_SWELL_DB / 2
    swell_db = np.interp(T, [LEAK_START_S, middle_s, LEAK_END_S], [-half_db, half_db, -half_db])
    leaks = []
    for i, c in zip(*firings()):
        if c in LEAK_DB and LEAK_START_S < T[i] < LEAK_END_S:
            db = LEAK_DB[c] + swell_db[i] + 1.5 * rng.standard_normal()
            leaks.append((T[i] + LEAK_LAG_S, db, LEAK_HZ * (1 + .09 * rng.standard_normal())))
    return leaks


def puffs():
    """Short hisses of escaping gas: a coloured core, a faint tone and a broad airy edge."""
    out, noise = np.zeros(N), noise_source()
    air = unit(band(noise_source(), 8200, 7000))
    for rows, air_db in (PUFFS, PUFF_AIR_DB), (joint_leaks(), LEAK_AIR_DB):
        for s, db, hz in rows:
            core = undb(7.5) * narrow(noise, hz, 2440) + undb(10) * narrow(noise, hz, 370)
            tone = undb(-8) * np.sin(2 * np.pi * hz * (T - s))
            out += bursts(s, db, 0.05, 0.00067) * (core + tone + undb(air_db) * air)
    return out


def rattles():
    """Loose parts chatter in short coarse bursts; each rings its own panel, the brackets and the body."""
    chatter = unit(noise_source() * undb(2.5 * walk(350)))
    body = resonate(chatter, BODY)
    # chance rattles: same columns as RATTLES
    bumps = rng.random((int(BUMPS_PER_S * BUMPS_END_S), 4))
    bumps = bumps * [BUMPS_END_S, 5, 600, 10] + [0, BUMP_DB - 2.5, 430, -19]
    out = np.zeros(N)
    for s, db, panel_hz, bracket_db in [*RATTLES, *bumps]:
        t60 = max(RATTLE_T60_S - T60_S_PER_DB * (db + 23.5), .03)
        span = slice(int(s * SR), int((s + t60) * SR))
        hits = chatter[span].copy()
        hits[int(.001 * SR)] += 5 + 3 * max(bracket_db + 5, 0)  # metal on metal opens with a hard contact
        panel = narrow(hits, panel_hz, 0.34 * panel_hz)
        panel = panel / np.std(panel[:int(.025 * SR)])  # levelled on its opening
        tilt = BRACKET_TILT * bracket_db
        spot_db = 2.5 * rng.standard_normal(len(BRACKET))  # every blow lands elsewhere
        modes = [(hz, w, g + d + tilt * np.log2(hz / 1850)) for (hz, w, g), d in zip(BRACKET, spot_db)]
        bracket = resonate(hits, modes)
        out[span] += bursts(s, db - 8.5, t60, 0.0017)[span] * (1.06 * panel + body[span])
        out[span] += bursts(s, db + bracket_db - 4, 1.1 * t60, .001)[span] * bracket
    return dull(out, 3700)


def squeaks():
    """Narrow bands of noise swell and fade, fluttering; low squeaks add sagging tones and an octave."""
    out, noise = np.zeros(N), noise_source() * undb(2.7 * walk(60))
    wobble = walk(120)
    for s, length, hz, db in SQUEAKS:
        i, n = int(s * SR), int(length * SR)
        breath = noise[i:i + n]
        tone = unit(narrow(breath, hz, 440))
        if 2 * hz < TOP_HZ:
            pitch = hz + SAG_HZ_PER_S * T[:n] + 45 * wobble[i:i + n]
            turns = 2j * np.pi * np.cumsum(pitch) / SR
            lines = sum(undb(g + 3.2 * walk(rate)[:n]) * np.exp(k * turns).real for k, g, rate in SQUEAL)
            octave = undb(OCTAVE_DB) * unit(narrow(breath, 2 * hz, 460))
            tone = 0.82 * unit(narrow(breath, 1.027 * hz, 500)) + lines + octave
        out[i:i + n] += undb(db) * tone * signal.windows.tukey(n, .6) * np.linspace(1.3, .7, n)
    return out


def scrapes():
    """Loose metal scrapes and sings: noise through one narrow resonance at a time."""
    return swells(SCRAPES, SCRAPE_WIDTH_HZ)


def pops():
    """Single late firings: a suck, a thump through pipe and muffler, a crack and a fizz of gas."""
    s, db, crack_db = np.transpose(POPS)
    at = (s * SR).astype(int)
    kicks, cracks = np.zeros((2, N))
    kicks[at], cracks[at] = undb(db), undb(db + crack_db)
    t = T[:int(.01 * SR)]
    shape = np.hanning(len(t)) - 1.6 * np.exp(-((t - .002) / .0008) ** 2)  # push with an early suck
    push = shape / shape.sum()
    thump = undb(-6) * ring(np.convolve(kicks, push)[:N], PIPE)
    boom = ring(np.convolve(kicks * np.abs(kicks) ** 0.55, push)[:N], MUFFLER)  # hard firings boom in the box
    front = np.convolve(cracks, shape)[:N]
    spray = bursts(s + 0.00027, db + crack_db, 0.07, 0.0022) * noise_source()
    crack = ring(undb(-27.5) * front + undb(-10.5) * spray, CRACK)
    fizz_db = FIZZ_DB + FIZZ_POWER * (db + 23.5) + FIZZ_PER_CRACK * crack_db
    fizz = bursts(s + 0.0012, fizz_db, 0.075, 0.00086) * resonate(noise_source(), FIZZ)
    return thump + boom + undb(4.0) * front + crack + fizz


def settling():
    """The block rocks on its rubber mounts as a slow decaying sine; knocks ring two body modes."""
    out, taps = np.zeros((2, N))
    for s, db, t60 in ROCKS:
        out += bursts(s, db, t60, 0.015) * np.sin(2 * np.pi * ROCK_HZ * (T - s))
    s, db = np.transpose(KNOCKS)
    taps[(s * SR).astype(int)] = undb(db)
    return out + ring(taps, KNOCK)


def starter():
    """Gear teeth grind and clash through ringing metal modes; the housing growls and the brushes hiss."""
    grind_db, housing_db = curves(STARTER)
    s, db, t60, *_ = np.transpose(CLASHES)
    on = T > STARTER[0][0]
    blows = bursts(s, db - 6.0, t60, RISE_SHARE * t60)
    teeth = unit(noise_source() * undb(0.63 * walk(400)))
    drive = on * undb(grind_db) + blows
    mode_db = np.interp(GEAR_HZ, *np.transpose(GEAR_WASH))
    # each mode comes and goes as the teeth meet at different spots, and rings on after a blow
    metal = sum(band(undb(g + 4 * walk(45)) * drive * teeth, hz, 65) for hz, g in zip(GEAR_HZ, mode_db))
    gears = undb(10.5) * dull(metal, 6900) + undb(-7.5) * drive * coloured(GEAR_WASH)
    for at, peak_db, ring_s, *sung in CLASHES:
        span = slice(int(at * SR), int((at + 1.5 * ring_s) * SR))
        for k, hz in enumerate(sung):
            rough = .7 * unit(narrow(teeth[span], hz, SING_WIDTH_HZ))
            pure = undb(2.5 * walk(70)[span]) * np.sin(2 * np.pi * (hz * T[span] + rng.random()))
            fall = bursts(at + k * SING_STAGGER_S, peak_db + SING_DB, ring_s, 0.0035)[span]
            gears[span] += fall * (rough + pure)
    snap = unit(narrow(teeth, 5500, 1800) + 0.18 * narrow(teeth, 11500, 5000))
    snap = snap + np.sin(2 * np.pi * 5530 * (T - ENGAGE_S))
    gears = gears + bursts(ENGAGE_S, ENGAGE_DB, ENGAGE_T60_S, 0.00024) * snap
    growl = teeth * undb(1.5 * walk(150))
    housing = unit(resonate(growl, BODY) + undb(-1.5) * unit(band(growl, 200, 200)))
    housing = housing * (on * undb(housing_db) + undb(-11.5) * blows)
    hiss = unit(narrow(teeth, 8000, 3500) + .15 * narrow(teeth, 12000, 7000)) * undb(2 * walk(30))
    hiss = hiss * ((T > CRANKS_S) * undb(BRUSH_DB) + undb(-24.5) * blows)
    return gears + housing + hiss


def groans():
    """The loaded starter groans in its housing: noise through very narrow resonances."""
    return swells(GROANS, GROAN_WIDTH_HZ)


def outdoor_echoes(truck):
    """Tree lines and parked cars return a few dull echoes, weaker the later they come."""
    echoes = np.zeros(int(.25 * SR))
    lags = rng.integers(int(.01 * SR), len(echoes), 60)
    echoes[lags] = rng.standard_normal(60) * undb(-60 * lags / SR / .5)
    return undb(-19.5) * band(signal.fftconvolve(truck, echoes)[:N], 680, 3600)


def stereo(mid):
    """Nearly mono, with a slight stereo width, mostly in the treble, that wavers at random."""
    treble = signal.sosfilt(signal.butter(1, 4000, "high", fs=SR, output="sos"), mid)
    side = undb(-15.5) * treble + undb(-14) * narrow(mid, 11000, 9000)
    side = side + undb(-36) * band(mid, 1650, 780) + undb(-33) * band(mid, 400, 500)
    side = (side + undb(-44) * mid) * walk(250)
    return np.array([mid + side, mid - side])


def scene():
    """The truck with its echoes, over the field."""
    truck = engine() + puffs() + rattles() + squeaks() + scrapes()
    truck = truck + pops() + settling() + starter() + groans()
    return stereo(truck + outdoor_echoes(truck) + field())


def record(dry):
    """The phone drops the deepest bass and cuts the top."""
    thin = signal.sosfilt(signal.butter(2, 35, "high", fs=SR, output="sos"), dry)
    return signal.sosfilt(signal.ellip(10, .2, 80, TOP_HZ, fs=SR, output="sos"), thin)


dry = scene()
out = record(dry)
master_out(out)
```